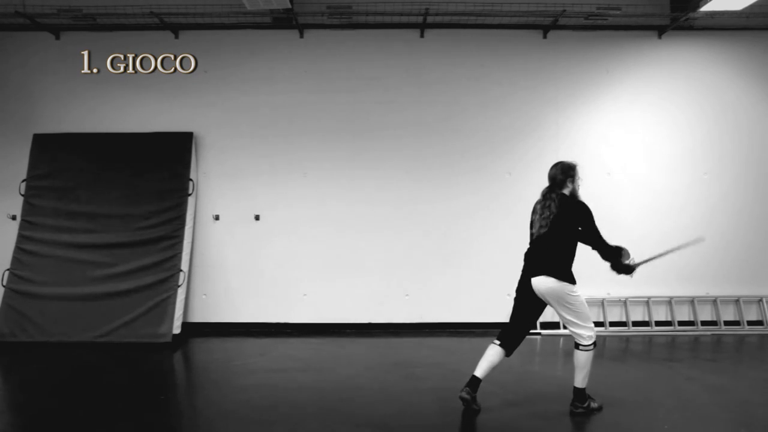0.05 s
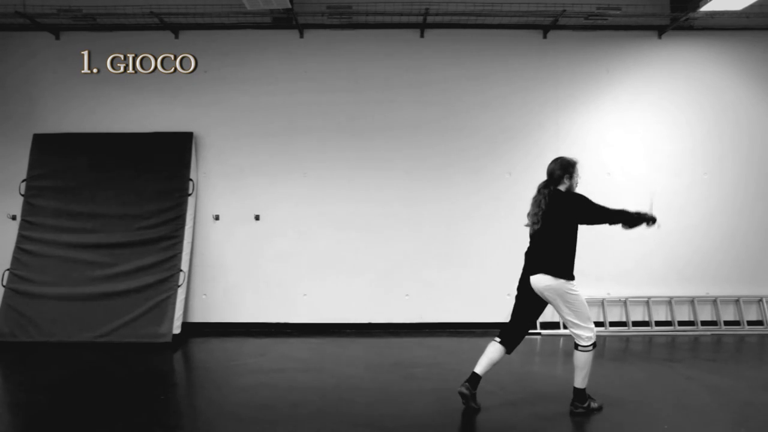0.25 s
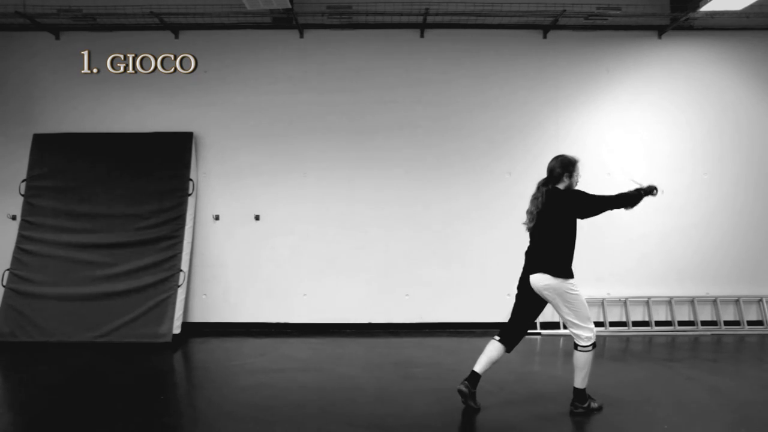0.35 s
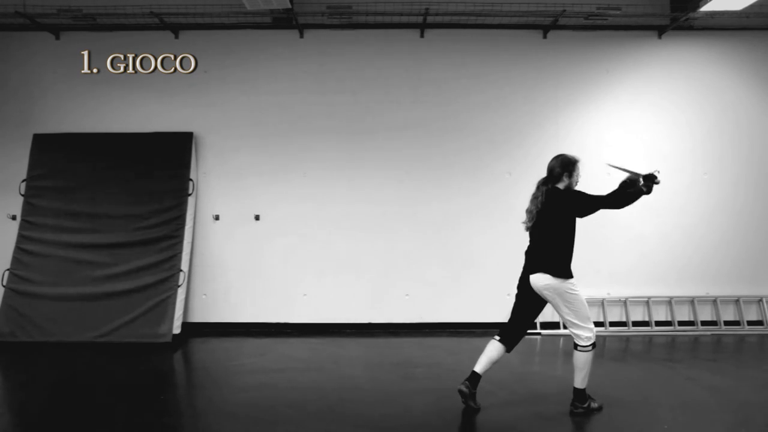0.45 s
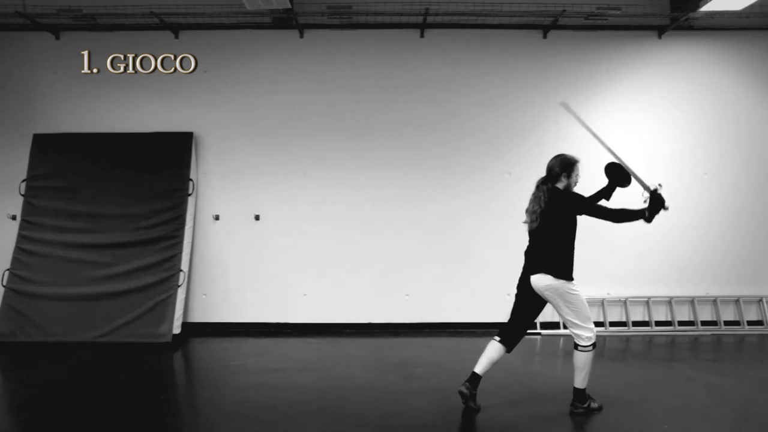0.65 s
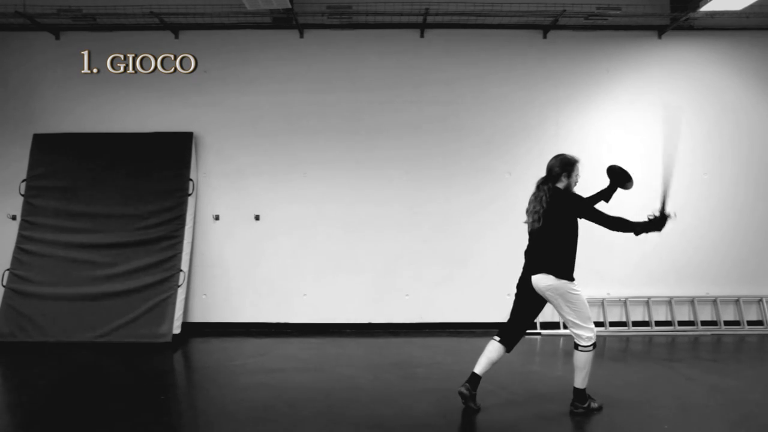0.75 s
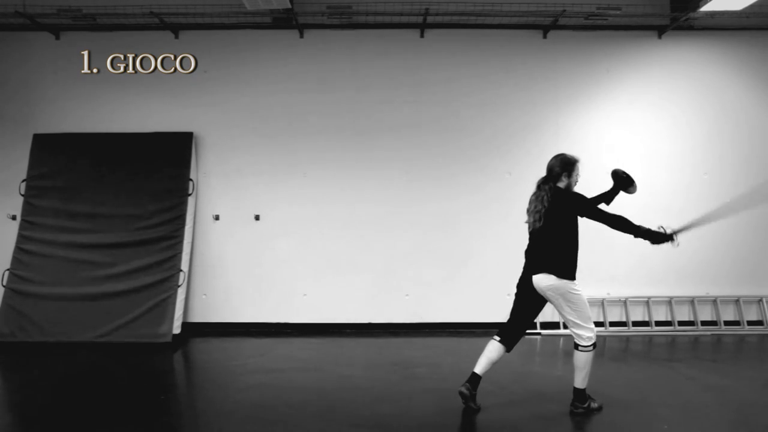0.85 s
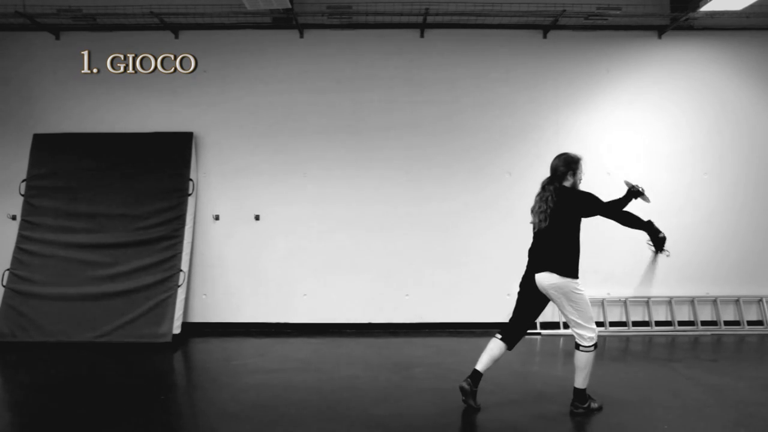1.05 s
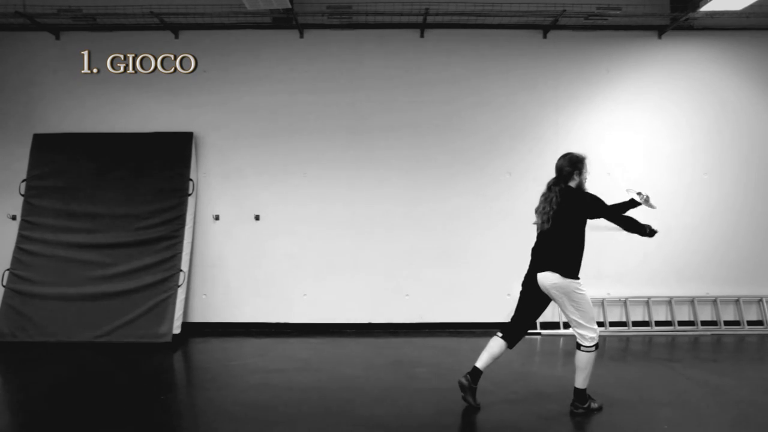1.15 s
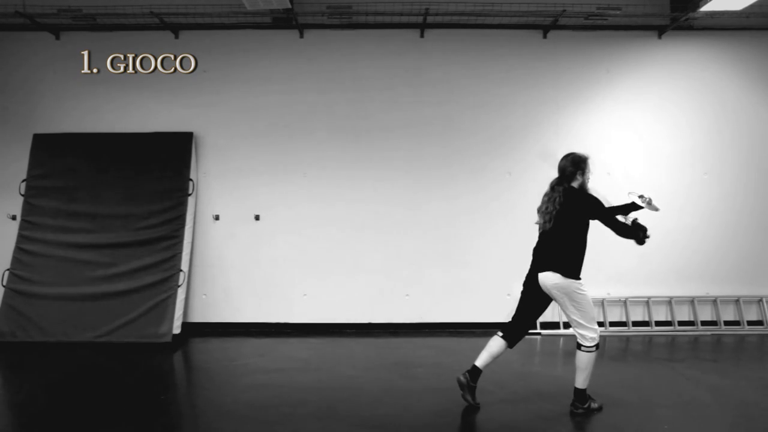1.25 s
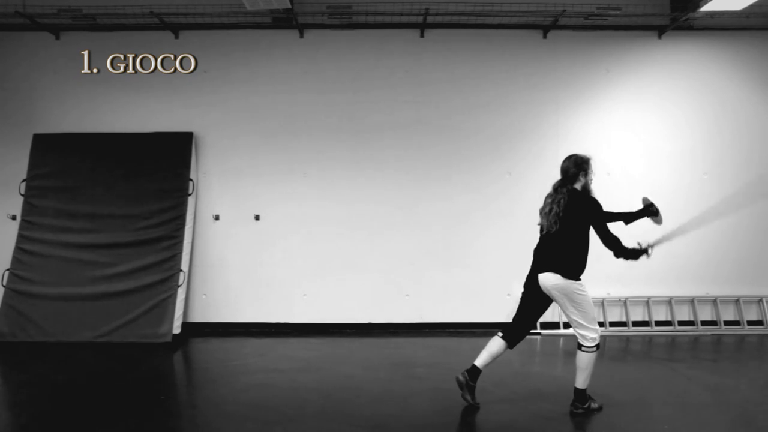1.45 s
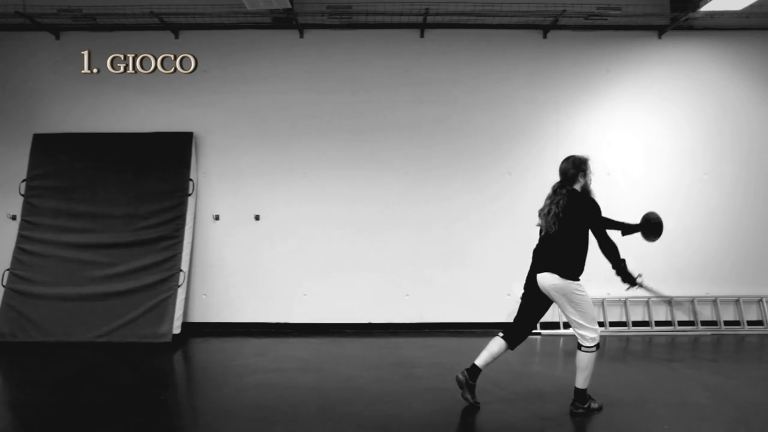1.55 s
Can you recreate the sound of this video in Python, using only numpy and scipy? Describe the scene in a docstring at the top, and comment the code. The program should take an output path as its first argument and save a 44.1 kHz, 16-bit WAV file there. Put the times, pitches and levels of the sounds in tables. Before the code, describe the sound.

A sword strikes a small steel shield once, echoing through a large hall.

```python
"""Sword on a steel shield

A blade strikes a small steel shield once in a large, hard-walled training hall. The crack and the
short ring of the steel come back from the walls and die away slowly. The blade swishes faintly
before and after, the floor thuds softly underfoot, and ventilation rumbles and hisses.
A gain control ducks at the blow and recovers."""
import sys
import numpy as np
from scipy import signal
from scipy.fft import rfft, irfft, next_fast_len
from scipy.io import wavfile
from scipy.ndimage import uniform_filter1d, minimum_filter1d, map_coordinates

SR = 44100
rng = np.random.default_rng(int(sys.argv[2]) if len(sys.argv) > 2 else 0)


def pcm_store(signal):
    """Save signal as 16-bit PCM."""
    levels = np.round(np.clip(np.atleast_2d(signal), -1, 1) * 32767)
    wavfile.write(sys.argv[1], SR, levels.astype(np.int16).T)


N = 70560
T = np.arange(N) / SR


def crack():
    """Blade meets shield: a sharp, minimum-phase click of energy 1."""
    # tone of the contact (frequency [Hz], relative level [dB])
    spectrum = [(100, -48), (300, -24.5), (600, -23), (880, -4.5), (1200, -7.5), (1600, -5), (2700, -7.5),
                (4400, -2.5), (5800, -1), (8300, -2), (9800, -7), (12500, -16.5), (16000, -28)]
    magnitude = amp(along(spectrum, np.fft.rfftfreq(N, 1 / SR)))
    cepstrum = irfft(np.log(magnitude), N)
    cepstrum[1:N // 2] *= 2  # folding the cepstrum packs the energy into the attack
    cepstrum[N // 2 + 1:] = 0
    click = irfft(np.exp(rfft(cepstrum)), N)
    return click / np.linalg.norm(click)


def ring(level_db=-39):
    """The struck steel rings in inharmonic modes that die quickly."""
    # modes of shield and blade (frequency [Hz], relative level [dB], t60 [s])
    steel_modes = [(1254, -8, .1), (1532, -2, .12), (1600, -3, .08), (1663, -3, .13), (2035, -7, .18),
                   (2185, -5, .11), (3553, -15, .5), (4657, -11, .4), (4735, -10, .2), (5407, -2, .19),
                   (5790, 0, .06), (6598, -3, .2), (6700, -3, .1), (6850, -1, .11), (7175, 2, .12),
                   (7640, -3, .16), (8128, -1, .19), (8600, -1, .16)]
    modes = sum(amp(db) * fade(T, t60) * np.sin(2 * np.pi * hz * T) for hz, db, t60 in steel_modes)
    return amp(level_db) * modes


def clank(pitch_hz=5500, level_db=-11.5):
    """The face of the shield throws a very short ring straight at the listener."""
    return amp(level_db) * fade(T, t60=.006) * np.sin(2 * np.pi * pitch_hz * T)


def hall():
    """Impulse response: direct path, near scatter, first walls, early echoes, far wall, long tail."""
    # tone of the direct path and near scatter (frequency [Hz], gain [dB])
    near_tone = [(300, 1), (900, 11), (1500, 7), (4500, 9.5), (6500, 4.5), (9000, 3.5), (14000, -7)]
    # slaps off the first walls (delay [s], level [dB])
    wall_slaps = [(.0034, -12), (.0048, -12), (.012, -3), (.0182, -11), (.0204, -9)]
    # tone of the early echoes (frequency [Hz], relative level [dB])
    early_tone = [(300, -5.5), (1500, 9), (4500, 6), (8000, 8), (14000, -7.5)]
    # decay of the tail (frequency [Hz], t60 [s])
    tail_decay = [(200, 0.82), (700, 1.09), (1600, 1.273), (3800, 1.55), (6000, 1.356), (8200, 0.99),
                  (10500, 0.71), (15000, 0.55)]
    direct = amp(-24) * unit(signal.unit_impulse(N))
    scatter = amp(6.5) * unit(burst(t60=.11))
    near = filtered(direct + scatter, lambda hz: amp(along(near_tone, hz)))
    # uneven walls smear each slap
    walls = sum(amp(db) * delayed(unit(burst(t60=.0065)), s) for s, db in wall_slaps)
    early_build_s, tail_build_s = .0044, .031
    early = noise(early_tone) * fade(T, t60=.3) * (1 - np.exp(-T / early_build_s))
    far_wall = delayed(burst(t60=.55), s=.122)  # scattered answer from the end of the hall
    hz, t, bands = signal.stft(rng.standard_normal(N), SR, nperseg=256)
    bands *= fade(t, along(tail_decay, hz)[:, None])
    tail = signal.istft(bands, SR)[1][:N] * (1 - np.exp(-T / tail_build_s))
    diffuse = delayed(amp(10) * unit(early) + amp(17.5) * unit(tail), s=.012)
    return (near + walls + diffuse + amp(3.5) * unit(far_wall)) / np.sqrt(N)


def swishes(half_width_octaves=.84):
    """Air rushes round the swung blade: a soft band of noise swells and fades."""
    # swings of the blade (peak time [s], half length [s], band centre [Hz], level [dB])
    swings = [(0.043, .1, 740, -49), (1.45, 0.06, 1060, -54), (1.57, .04, 1160, -53.5)]
    out = np.zeros(N)
    for peak_s, half_s, centre_hz, db in swings:
        band = lambda hz: 1 / (1 + (np.log2((hz + 1) / centre_hz) / half_width_octaves) ** 2)
        air = unit(filtered(rng.standard_normal(N), band))
        swell = np.exp(-.5 * ((T - peak_s) / half_s) ** 2)
        out += amp(db) * air * swell
    return out


def floor_thuds(rise_s=.015):
    """Shifting weight makes the floor boom softly."""
    # footfalls (time [s], level [dB])
    footfalls = [(.0, -50), (0.162, -46), (1.014, -45.5)]
    # boom of the floor (frequency [Hz], relative level [dB])
    floor_tone = [(25, -36), (65, -1.5), (100, -19.5), (145, 5.5), (200, -24.5), (400, -59), (1000, -71)]
    swell = T / rise_s * np.exp(1 - T / rise_s)
    return sum(amp(db) * delayed(swell * noise(floor_tone), s) for s, db in footfalls)


def ventilation(rumble_db=-48.5, hiss_db=-47.5, waver_db=3.4, waver_hz=12):
    """The ventilation lays a slightly wavering rumble under a steady hiss."""
    # low rumble (frequency [Hz], relative level [dB])
    rumble_tone = [(12, -34), (20, -13.5), (65, 0), (102, -7), (140, -4.5), (198, -11.5), (275, -18),
                   (336, -14), (366, -12.5), (400, -20), (520, -30), (880, -120)]
    # airy hiss (frequency [Hz], relative level [dB])
    hiss_tone = [(150, -52), (250, -7.5), (624, -8.5), (850, -10.5), (1600, -9), (2500, -10.5), (4400, -10),
                 (6500, -7), (8000, -12.5), (9500, -19), (11000, -21), (12500, -30.5), (15500, -31)]
    waver = map_coordinates(rng.standard_normal(N), [T * waver_hz])
    rumble = amp(rumble_db + waver_db * waver) * noise(rumble_tone)
    return rumble + amp(hiss_db) * noise(hiss_tone)


def amp(db):
    """Decibels to gain."""
    return 10 ** (np.asarray(db) / 20)


def unit(x):
    """Scale to rms 1."""
    return x / np.sqrt(np.mean(x ** 2) + 1e-20)


def along(points, hz):
    """Read a curve of (frequency [Hz], value) points on a log frequency axis."""
    freqs, values = np.transpose(points)
    return np.interp(np.log(hz + 1), np.log(freqs + 1), values)


def filtered(x, gain):
    """Zero-phase EQ by the curve gain(hz)."""
    size = next_fast_len(2 * N)
    return irfft(rfft(x, size) * gain(np.fft.rfftfreq(size, 1 / SR)), size)[:N]


def noise(spectrum):
    """Coloured noise of rms 1."""
    return unit(filtered(rng.standard_normal(N), lambda hz: amp(along(spectrum, hz))))


def fade(t, t60):
    """Exponential decay, 60 dB down after t60 seconds."""
    return np.exp(-np.log(1000) * t / t60)


def burst(t60):
    """White noise that starts at once and dies away."""
    return rng.standard_normal(N) * fade(T, t60)


def delayed(x, s):
    """x, s seconds later."""
    return np.pad(x, (max(0, round(s * SR)), 0))[:N]


def scene(strike_s=.2341, strike_db=9):
    """One blow over the background; crack and ring take different paths through the hall."""
    in_hall = sum(signal.fftconvolve(part, hall())[:N] for part in (crack(), ring()))
    blow = amp(strike_db) * (in_hall + clank())
    return (delayed(blow, strike_s) + swishes() + floor_thuds() + ventilation())[None]


def record(dry):
    """Gain control that ducks fast, holds and recovers slowly, then a steep treble cut."""
    threshold_db, duck_per_db, top_hz = -25, .58, 15800
    attack_s, hold_s, glide_s, release_db_per_s = .004, .11, .0047, 19
    x = dry[0]
    pole = np.exp(-1 / (attack_s * SR))
    power = signal.lfilter([1 - pole], [1, -pole], x ** 2)
    level_db = 10 * np.log10(power + 1e-12)
    target_db = duck_per_db * np.maximum(level_db - threshold_db, 0)
    half_hold = int(hold_s * SR / 2)
    held_db = -minimum_filter1d(-target_db, 2 * half_hold + 1, origin=half_hold, mode="nearest")
    release_ramp = release_db_per_s * T
    duck_db = np.maximum.accumulate(held_db + release_ramp) - release_ramp
    gain = amp(-uniform_filter1d(duck_db, int(glide_s * SR) + 1))
    return filtered(x * gain, lambda hz: hz < top_hz)[None]


dry = scene()
out = record(dry)
pcm_store(out)
```